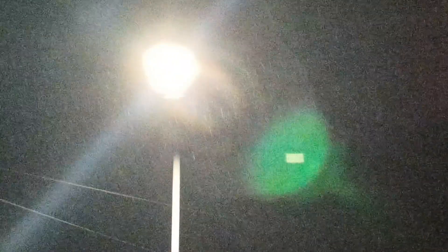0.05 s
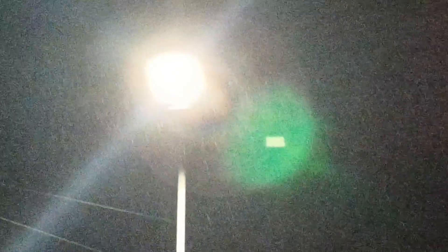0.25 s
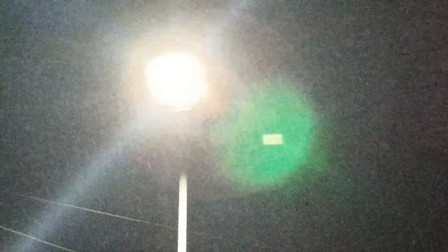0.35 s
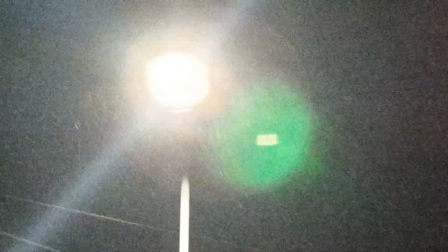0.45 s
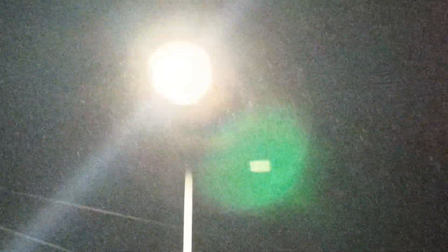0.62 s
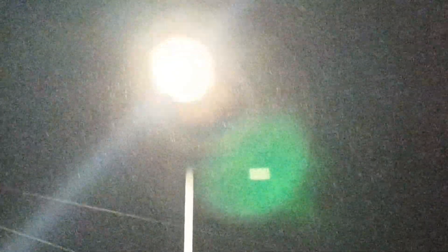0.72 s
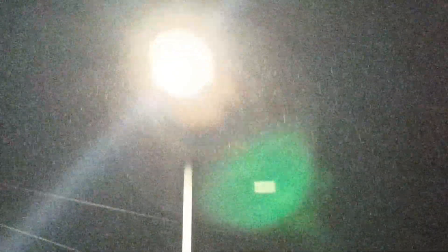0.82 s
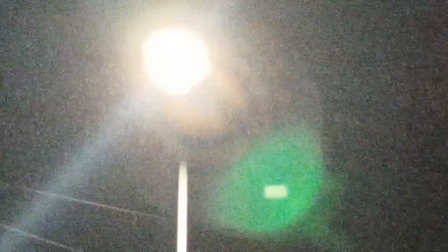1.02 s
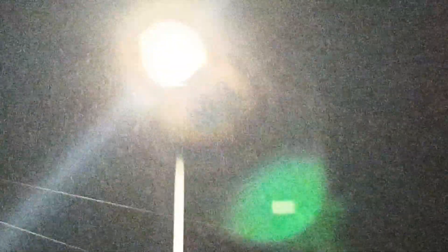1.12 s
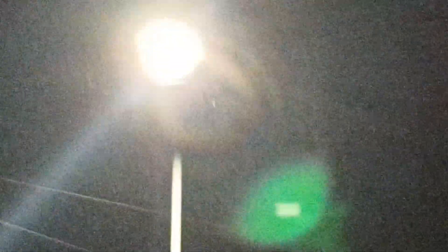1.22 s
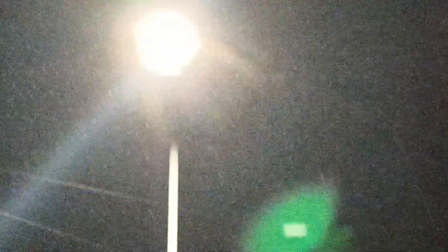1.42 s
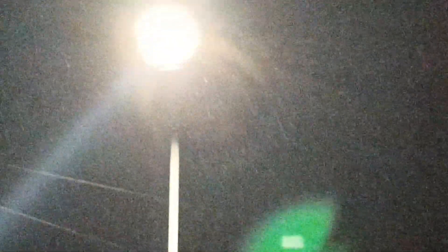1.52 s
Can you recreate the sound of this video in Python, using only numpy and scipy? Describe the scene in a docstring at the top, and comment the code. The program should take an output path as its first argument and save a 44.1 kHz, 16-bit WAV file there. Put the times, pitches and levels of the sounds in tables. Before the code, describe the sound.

A puff of wind rumbles on the microphone, mostly on the left, with two dull thumps. It dies away, leaving a quiet night outdoors with very faint distant town noise, machinery hum, hiss and a thin electronic whine.

```python
"""A quiet night outdoors under a street lamp.
From the start: far town murmur, distant machinery hum, hiss and a thin whine from the electronics.
From 0.2 to 0.8 s a puff of wind rumbles on the microphone, mostly on the left port; eddies strike
it with two dull thumps, near 0.21 and 0.44 s. The whine then rises slowly, the wind dies away,
and faint chirps, far bumps and ticks show above the background."""
import sys
import numpy as np
from scipy import signal
from scipy.fft import rfft, irfft
from scipy.io import wavfile
from scipy.ndimage import uniform_filter1d

SR = 44100
rng = np.random.default_rng(int(sys.argv[2]) if len(sys.argv) > 2 else 0)


def transcribe(signal):
    """Save signal, clipped to [-1, 1], as a 16-bit WAV file at the path in sys.argv[1]."""
    frames = np.atleast_2d(signal).T
    limited = np.clip(frames, -1, 1)
    pcm = np.round(limited * 32767).astype(np.int16)
    wavfile.write(sys.argv[1], SR, pcm)


N = 68355
BIN_HZ = np.arange(N // 2 + 1) * SR / N


def from_db(db):
    """Decibels to gain."""
    return 10 ** (np.asarray(db) / 20)


def unit_rms(x):
    """Scale to rms 1."""
    return x / np.sqrt(np.mean(x ** 2) + 1e-30)


def per_sample(rows):
    """Time table, interpolated at every sample."""
    return np.interp(np.arange(N) / SR, *np.transpose(rows))


def per_bin(rows):
    """Frequency table, interpolated at every bin on a log axis."""
    hz, value = np.transpose(rows)
    return np.interp(np.log(BIN_HZ + 1e-9), np.log(hz), value)


def resonance(hz, half_width_hz):
    """Gain per bin of a peak with broad, slowly falling skirts."""
    return 1 / (1 + ((BIN_HZ - hz) / half_width_hz) ** 2)


def bell(centre_s, sigma_s):
    """Gaussian pulse, height 1."""
    return np.exp(-.5 * ((np.arange(N) / SR - centre_s) / sigma_s) ** 2)


def noise(gain):
    """Noise shaped by a gain per bin; rms 1."""
    return unit_rms(irfft(rfft(rng.standard_normal(N)) * gain, N))


def stereo_noise(gain, correlation=0):
    """Shaped noise with a given L/R correlation; rms 1."""
    mid, side = rfft(rng.standard_normal((2, N)))
    correlation = np.clip(correlation, -.98, .98)
    mid, side = mid * np.sqrt(1 + correlation), side * np.sqrt(1 - correlation)
    return unit_rms(irfft(np.array([mid + side, mid - side]) * gain, N))


def drift(rate_hz):
    """Slow random wander; rms 1."""
    return noise(resonance(0, rate_hz))


def levelled(x, span_s):
    """Noise with its slow level swings removed; rms 1."""
    power = uniform_filter1d(np.abs(signal.hilbert(x)) ** 2, max(int(span_s * SR), 1), mode="wrap")
    return unit_rms(x / np.sqrt(power + 1e-9))


# Hiss spectrum: f/Hz, relative density/dB
HISS_SPECTRUM = [(200, -2), (2500, -1.5), (4000, -1.5), (6000, -1.5), (7000, -7.5), (8000, -14),
                 (9200, -13), (10600, -8.5), (12000, -14), (13800, -13.5), (14900, -1), (16000, -3)]
# Whine glide: t/s, f/Hz
WHINE_GLIDE = [(0, 10430), (.45, 10430), (.95, 10690), (1.55, 10900)]
def electronics(hiss_db=-80.5, whine_left_db=-109, whine_right_db=-102, waver_hz=16):
    """Independent hiss per channel and a thin, rising whine."""
    hiss = from_db(HISS_DB := hiss_db) * stereo_noise(from_db(per_bin(HISS_SPECTRUM)))
    pitch_hz = per_sample(WHINE_GLIDE) + waver_hz * drift(rate_hz=15)
    whine = np.sin(2 * np.pi * np.cumsum(pitch_hz) / SR)
    return hiss + from_db([[whine_left_db], [whine_right_db]]) * whine


# Murmur spectrum: f/Hz, relative density/dB
MURMUR_SPECTRUM = [(20, -6), (60, -2), (120, -1), (230, -6.5), (330, -8.5), (480, -7.5), (700, -16.5),
                   (1000, -16), (1500, -22.5), (2200, -31.5), (4000, -40.5), (9000, -61)]
# Murmur stereo image: f/Hz, L/R correlation
MURMUR_CORRELATION = [(60, .6), (170, 0.4), (260, .3), (350, -0.49), (500, -0.97), (720, 0.082),
                      (1080, -0.31), (1400, 0.12), (3000, 0.22)]
# Murmur swell: t/s, gain/dB
MURMUR_SWELL = [(0, -1), (.5, -0.5), (1.0, -1), (1.16, -0.5), (1.3, 0), (1.55, -1.5)]
def town_murmur(level_db=-69, pan_db=-0.16):
    """Dull, diffuse noise of the far-off town."""
    murmur = stereo_noise(from_db(per_bin(MURMUR_SPECTRUM)), per_bin(MURMUR_CORRELATION))
    return from_db([[pan_db], [-pan_db]]) * from_db(level_db + per_sample(MURMUR_SWELL)) * murmur


# Main hum swell: t/s, gain/dB
MAIN_HUM_SWELL = [(0, 3.5), (.2, -2.5), (.32, 4), (.5, -1), (.75, 0), (.95, 1), (1.12, 5.5), (1.3, -3),
                  (1.55, -1)]
# Weaker machinery tones: f/Hz, level/dB, half width/Hz, L/R correlation
WEAK_TONES = [(429.5, -87, 21, -.5), (584, -94.5, 10, -0.34), (868, -99, 13, -0.17),
              (1692, -102, 3.7, 0.14), (2980, -104, 3, 0.31)]
def machinery(hum_hz=426, hum_db=-79.5, wander_hz=3, flicker_db=2, right_lag_rad=2.44):
    """One clear hum, wavering on its long path through the air, plus weaker blurred tones."""
    phase = 2 * np.pi * np.cumsum(hum_hz + wander_hz * drift(rate_hz=7)) / SR
    hum = np.sqrt(2) * np.array([from_db(flicker_db * drift(rate_hz=10)) * np.sin(phase - lag)
                                 for lag in (0, right_lag_rad)])
    tones = sum(from_db(db) * levelled(stereo_noise(resonance(hz, half_hz), correlation), span_s=.08)
                for hz, db, half_hz, correlation in WEAK_TONES)
    return from_db(hum_db + per_sample(MAIN_HUM_SWELL)) * hum + tones


# Noise bursts: t/s, length/s, f/Hz, bandwidth/Hz, left level/dB, right level/dB
BURSTS = [(0.138, 0.035, 235, 120, -72.5, -78.5), (0.232, 0.0073, 4680, 300, -86, -85.5),
          (.526, .006, 11200, 600, -104, -86), (0.88, .05, 5080, 92, -88, -104),
          (.94, 0.034, 5030, 90, -90, -104), (1.142, 0.011, 230, 69.8, -66, -66.5),
          (1.218, .08, 223, 121, -73.5, -77), (1.197, 0.047, 730, 403, -79.5, -80.5),
          (1.526, .007, 10250, 500, -85, -100), (1.518, .007, 8000, 11000, -78.5, -90)]
def ticks():
    """Faint ticks, chirps and far bumps: brief bursts of band noise."""
    bursts = np.zeros((2, N))
    for at_s, length_s, hz, width_hz, left_db, right_db in BURSTS:
        band = levelled(stereo_noise(resonance(hz, width_hz / 2)), span_s=0.0076)
        bursts += from_db([[left_db], [right_db]]) * bell(at_s, length_s / 2) * band
    return bursts


# Wind pressure, left port: t/s, level/dB
LEFT_PRESSURE = [(0, -75), (.09, -71.5), (.18, -48), (.228, -42.5), (.25, -55.5), (.275, -58), (.298, -39),
                 (.32, -40.5), (.342, -59.5), (.375, -39.5), (.39, -43.5), (.41, -40), (.49, -36.5),
                 (.53, -44.5), (.568, -41), (.59, -54.5), (.625, -48), (.67, -40.5), (.71, -43.5),
                 (.736, -35.5), (.758, -47.5), (.782, -39.5), (.83, -57), (.88, -69), (.94, -59.5),
                 (1.0, -67.5), (1.37, -58.5), (1.47, -67.5), (1.55, -85)]
# Wind pressure, right port: t/s, level/dB
RIGHT_PRESSURE = [(0, -71), (.13, -73), (.18, -56), (.23, -83), (.41, -67), (.465, -61.5), (.59, -53.5),
                  (.64, -64.5), (0.688, -36.5), (0.739, -62.5), (0.881, -54), (.96, -64.5), (1.2, -72.5),
                  (1.55, -72.5)]
# Rumble spectrum: f/Hz, relative density/dB
RUMBLE_SPECTRUM = [(12, -18), (30, -2.5), (52, 1.5), (75, -3), (110, -15), (160, -36.5), (260, -51.5),
                   (500, -75.5), (1500, -110)]
# Flutter spectrum: f/Hz, relative density/dB
FLUTTER_SPECTRUM = [(40, -22), (75, -7), (105, 5), (140, -7), (200, -25), (300, -31), (500, -52.5),
                    (1500, -100)]
# Flutter envelope: t/s, level/dB re rumble
FLUTTER_LEVEL = [(0, -20.5), (.14, -12), (.3, -29.5), (.345, -24), (.375, -11), (.41, -22), (.475, -9),
                 (.52, -14.5), (.6, -9.5), (.665, -9.5), (.72, -24), (.8, -22.5), (.95, -6), (1.55, -14.5)]
def wind():
    """Each port's own turbulence follows the pressure on it: deep rumble, flutter above."""
    flutter_gain = from_db(per_sample(FLUTTER_LEVEL))
    ports = []
    for pressure in (LEFT_PRESSURE, RIGHT_PRESSURE):
        rumble = levelled(noise(from_db(per_bin(RUMBLE_SPECTRUM))), span_s=0.033)
        flutter = levelled(noise(from_db(per_bin(FLUTTER_SPECTRUM))), span_s=0.074)
        ports.append(from_db(per_sample(pressure)) * (rumble + flutter_gain * flutter))
    return np.array(ports)


# Eddies on the left port: t/s, pulse gain/dB, sigma/s
EDDIES = [(.2066, -20, 0.0015), (0.4348, -23.5, .0013), (0.4395, -13, 0.0013), (0.4529, -26, 0.0014),
          (.469, -27, 0.0014), (0.477, -26.5, 0.0016), (0.495, -27.5, 0.0026), (1.515, -41.5, 0.0027)]
def eddy_thumps(suction_ratio=0.34, width_ratio=2.4, bass_cut_hz=35, right_db=-42):
    """An eddy is a pressure pulse in a wider suction trough; the port's bass cut makes it swing back."""
    pressure = np.zeros(N)
    for at_s, db, sigma_s in EDDIES:
        suction = suction_ratio * bell(at_s, width_ratio * sigma_s)
        pressure += from_db(db) * (bell(at_s, sigma_s) - suction)
    bass_cut = signal.butter(2, bass_cut_hz, "high", fs=SR, output="sos")
    thumps = signal.sosfilt(bass_cut, pressure + 1e-18)
    return np.array([thumps, from_db(right_db) * thumps])


def scene():
    """Wind on the ports over the night background."""
    return wind() + eddy_thumps() + town_murmur() + machinery() + electronics() + ticks()


def record(dry):
    """Steep elliptic low-pass."""
    cutoff_hz = 15800
    return signal.sosfilt(signal.ellip(12, .1, 80, cutoff_hz, fs=SR, output="sos"), dry)


dry = scene()
out = record(dry)
transcribe(out)
```